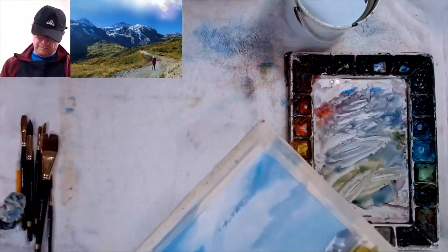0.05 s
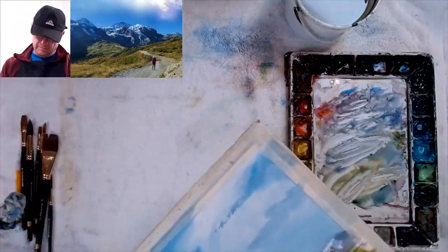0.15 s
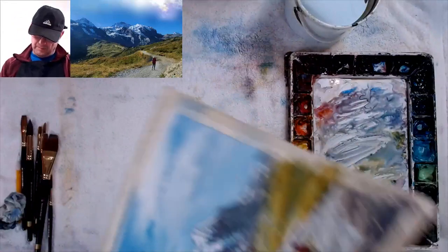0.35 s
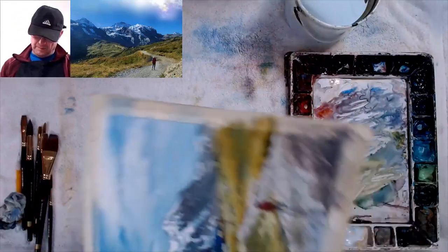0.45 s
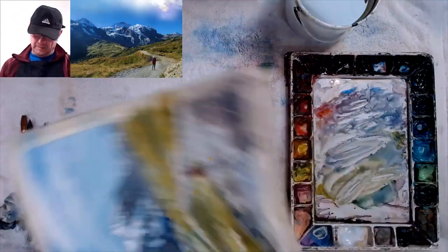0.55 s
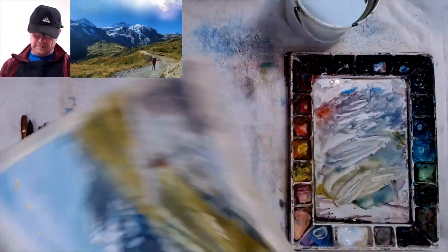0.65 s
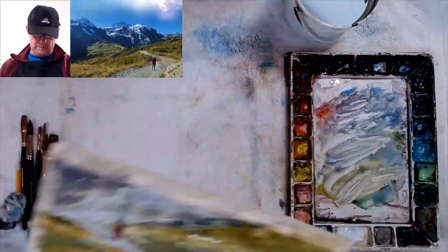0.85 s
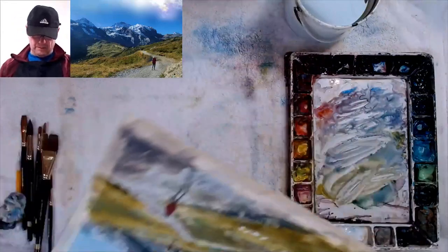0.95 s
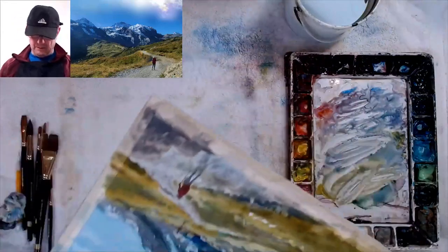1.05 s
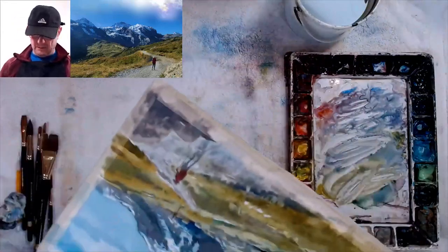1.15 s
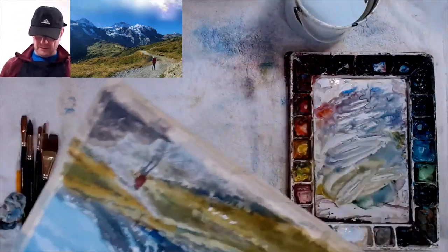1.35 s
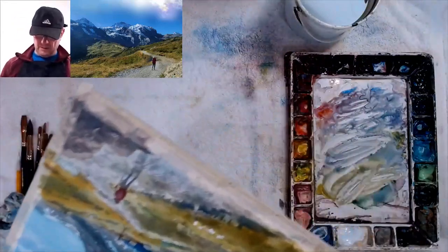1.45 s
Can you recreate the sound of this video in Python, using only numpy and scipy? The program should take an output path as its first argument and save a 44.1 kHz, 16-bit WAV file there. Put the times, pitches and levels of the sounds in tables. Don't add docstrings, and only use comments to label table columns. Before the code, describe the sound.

Masking tape being peeled from stiff paper, close up in a small quiet room. A tiny snap at 0 s, near silence, then from about 0.21 s a loud, bright, gritty rip of dense uneven clicks, ending abruptly at 0.7 s. Paper creases pop from 0.85 s, with a firmer rub near 1.1 s, then faint ticks to 1.45 s. Low rumble, hiss and brief watery, tonal dropouts.

```python
import sys
import numpy as np
from scipy import signal
from scipy.fft import rfft, irfft
from scipy.io import wavfile
from scipy.ndimage import uniform_filter1d

SR = 44100
rng = np.random.default_rng(int(sys.argv[2]) if len(sys.argv) > 2 else 0)


def volts_from_db(level):
    exponent = np.asarray(level, float) / 20
    return 10 ** exponent


def dump_mix(stems):
    frames = np.atleast_2d(stems).T
    limited = np.clip(frames, -1, 1)
    pcm = np.round(limited * 32767).astype(np.int16)
    wavfile.write(sys.argv[1], SR, pcm)


N = 66150

# [f/Hz, level/dB]
STUDIO_COLOUR = [(20, -4), (90, -7.5), (300, -13), (700, -19.5), (1600, -23.5), (4500, -28), (9000, -29),
                 (16000, -33.5)]
# [t/s, f/Hz, level/dB, decay/s]
KNOCKS = [(0.00202, 2400, -44, 0.0026), (0.169, 300, -55, 0.015), (0.25, 410, -54, 0.0068),
          (.425, 315, -47, 0.01), (.41, 95, -55.5, 0.013), (0.56, 150, -53, 0.0093),
          (0.63, 2100, -34, .006), (0.23, 2400, -39, 0.003), (0.21, 420, -45, 0.02),
          (.26, 2080, -22, 0.0013), (.287, 2280, -27, 0.0012), (.484, 210, -58.5, 0.0091),
          (0.62, 2000, -27.5, 0.0022), (0.64, 1926, -31.5, 0.0021), (0.52, 1700, -36, 0.0047),
          (0.63, 1950, -32, 0.0056), (0.71, 1860, -39.5, .003), (0.51, 1960, -37, 0.0027),
          (.688, 700, -32, 0.002), (0.69, 1170, -35, 0.0044), (.688, 220, -44, 0.0018),
          (.686, 116, -51, 0.01), (1.077, 96, -53, 0.0058), (1.245, 120, -62, 0.0086),
          (1.424, 75, -54.5, 0.011)]
# [t/s, rise/s, hold/s, fall/s, level/dB]
RUBS = [
    (0.932, .012, 0.047, 0.046, -55),
    (0.999, 0.019, 0.029, 0.042, -58.5),
    (1.057, 0.022, 0.019, 0.066, -38),
    (1.372, .01, 0.034, 0.028, -67),
]
# [f/Hz, level/dB]
RUB_COLOUR = [(300, -38.5), (1300, -21.5), (2700, -7), (4300, -8.5), (5800, -11.5), (8200, -6.5),
              (11500, -12), (16000, -17)]
# [t/s, peak level/dB, f/Hz, tail/s]
TICKS = [(0.8847, -26.5, 13400, 0.012), (0.8969, -34.5, 11500, .009), (0.9468, -33.5, 4900, 0.0037),
         (0.9536, -36.5, 5070, .005), (0.9607, -35.5, 4700, 0.008), (0.987, -41, 2520, 0.016),
         (1.0317, -44, 4120, .008), (1.0655, -41, 7600, .003), (1.072, -36, 4120, 0.0046),
         (1.0787, -34, 9700, 0.0037), (1.079, -41, 4300, .0041), (1.088, -29.5, 8200, 0.005),
         (1.105, -29, 2800, 0.0016), (0.988, -46, 11500, .008), (.947, -44, 12000, .004),
         (1.2473, -51, 4400, 0.0063), (1.2482, -48, 10500, 0.0057), (1.3288, -49.5, 7400, .008),
         (1.383, -43.5, 6800, 0.0034), (1.3836, -55, 4240, .003), (1.392, -54, 3700, .01),
         (1.394, -53, 10500, .008), (1.454, -51.5, 5900, .003), (1.456, -56.5, 3400, 0.0026),
         (.855, -46.5, 8500, .003)]
# [t/s, peak level/dB, f/Hz]
TUGS = [(0.0029, -21, 7580), (0.2127, -23, 7390), (0.2146, -23, 6730), (0.2271, -17, 8390),
        (0.2337, -13, 8910), (0.2374, -14, 7850), (0.2407, -15, 8410), (0.2474, -11, 7610),
        (0.2493, -12, 6900), (0.2534, -16, 8240), (0.2563, -16, 7660), (0.2633, -13, 8390),
        (0.2663, -14, 8560), (0.2693, -16, 7710), (0.2763, -14, 8700), (0.2791, -14, 8780),
        (0.2854, -14, 8280), (0.2902, -13, 8400), (0.2967, -12, 8690), (0.3064, -8, 8760),
        (0.3314, -12, 8440), (0.3358, -10, 8510), (0.3431, -12, 8440), (0.3497, -11, 8480),
        (0.3578, -12, 8960), (0.3658, -15, 8370), (0.3726, -16, 8750), (0.3842, -13, 8780),
        (0.3877, -13, 8520), (0.3901, -16, 8760), (0.3989, -15, 8550), (0.4107, -18, 9070),
        (0.4207, -21, 9190), (0.4284, -18, 8390), (0.4412, -20, 8710), (0.4521, -18, 9020),
        (0.4567, -16, 8370), (0.4773, -15, 7870), (0.4827, -14, 8060), (0.4877, -12, 8470),
        (0.4939, -13, 8510), (0.4989, -14, 8610), (0.5064, -15, 7880), (0.5126, -17, 8630),
        (0.5209, -12, 9150), (0.5308, -15, 9230), (0.5463, -11, 8740), (0.5514, -13, 8130),
        (0.5558, -9, 8810), (0.5579, -14, 7880), (0.5759, -11, 7810), (0.5778, -14, 7850),
        (0.5831, -14, 8250), (0.5957, -14, 8650), (0.6206, -12, 8390), (0.6326, -13, 8850),
        (0.6453, -16, 8380), (0.6524, -18, 8380), (0.6703, -17, 8380), (0.6894, -10, 8650)]
# [t/s, snap level/dB, sheet shake re snap/dB]
PULL = [(0, -33, 10), (.008, -39.5, 6.5), (.022, -47.5, 17), (.04, -70.5, 23), (.125, -66, 17.5),
        (0.164, -46.5, 12.5), (.222, -44, 7), (0.23, -24.5, 1.5), (.27, -27.5, 4.5), (.305, -21.5, -4),
        (0.389, -25.5, -4), (0.416, -31.5, -0.5), (.48, -27, -3), (.55, -22, -3), (.6, -24, -5.5),
        (0.683, -27.5, 1.5), (.692, -33, 14), (0.699, -80, 3)]
# [f/Hz, width/Hz, level/dB]
TAPE_BANDS = [(8800, 1340, 1.5), (7050, 4200, -2), (9520, 790, -3.5), (11440, 2600, -4),
              (14200, 4000, -8.5)]
# [f/Hz, width/Hz, level/dB]
SHEET_BANDS = [(5850, 1460, -6.5), (4390, 860, -10), (3150, 2050, -7), (2043, 800, -8), (1224, 600, -15.5),
               (740, 800, -20), (442, 250, -17.5), (220, 120, -29)]
# [t/s, length/s, live sound/dB, loudest band/dB, notch/dB]
GAPS = [
    (0.302, .033, -15, 0.5, -23),
    (0.553, 0.019, -8, -1, 9),
    (0.599, 0.017, -4, -3, 6),
    (0.914, 0.02, -1, -5, -9),
    (1.301, 0.017, -9, -10, -3),
]
# [f/Hz, rms level/dB, share of the gap]
HELD_TONES = [
    [(263, -44, 1.2), (1278, -40.5, 0.6), (1970, -39, 1.5), (2750, -40, 0.76), (4300, -40.5, 0.62),
     (4540, -42, 0.45), (5070, -38, 0.61), (5430, -46.5, 0.45), (5680, -40, 1.1), (7140, -35, 0.45),
     (7720, -31, 1.2), (8760, -25.5, 1.1), (9500, -46, 0.53), (11500, -50, 0.96)],
    [(1962, -39, 1.64), (3373, -40.5, 1.05), (4594, -35.5, 2), (5120, -38.5, 0.7), (5780, -35.5, 1.3),
     (6280, -33, 0.8), (6700, -34, 1.7), (8100, -45, 0.78), (8860, -30, 1.5), (9200, -31, 1.1)],
    [(1866, -37, 1.2), (3685, -41.5, 1), (5680, -37, 1.7), (5570, -39, 1.6), (6520, -31.5, 0.7),
     (8200, -41, .9), (8800, -31.5, 0.85), (8940, -40, .8), (12550, -39.5, 1)],
    [(870, -71, 1.1), (4683, -66, .95), (5500, -65.5, 1.1), (6900, -64, 0.85), (7940, -70, 1.1),
     (8193, -68, 1.1), (11300, -72, .9), (12312, -74, .9), (13600, -73, .9)],
    [(655, -72, 1), (1160, -77, .9), (1960, -76.5, .9), (2213, -81, .9), (3200, -89, .9), (4506, -76, .9),
     (4915, -80, .9), (5496, -77, .9), (9663, -79, .9), (10083, -82, 0.98), (11127, -83, 0.82),
     (13243, -85, .9)],
]


def unit(x):
    return x / np.sqrt(np.mean(x ** 2))


def ring(x, hz, width):
    b, a = signal.iirpeak(hz, max(hz / width, .3), fs=SR)
    return signal.lfilter(b, a, x) * np.sqrt(SR / width / 10)


def steep(x, hz, kind):
    return signal.sosfiltfilt(signal.butter(2, hz, kind, fs=SR, output="sos"), x)


def colour(x, points):
    point_hz, point_db = np.array(points).T
    hz = np.fft.rfftfreq(N, 1 / SR) + 1
    gain = volts_from_db(np.interp(np.log(hz), np.log(point_hz), point_db))
    return unit(irfft(rfft(x) * gain, N))


def walk(rate):
    k = int(SR / rate)
    steps = np.repeat(rng.standard_normal(N // k + 1), k)
    return uniform_filter1d(steps, k)[:N] * 0.78


def crackle(rate, scatter_db):
    chance, sign, size = rng.random((3, N))
    level_db = np.minimum(-np.log(size + 1e-9), 3.2) * scatter_db
    return unit((chance < rate / SR) * np.sign(sign - .5) * volts_from_db(level_db))


def studio():
    hum = colour(rng.standard_normal(N), STUDIO_COLOUR) * volts_from_db(-61.5 + 2.3 * walk(6.7))
    whine = unit(ring(rng.standard_normal(N), 4540, 30))
    return hum + volts_from_db(-81) * whine


def room(x, t):
    low_t60_s, top_t60_s, split_hz, first_echo_s = 0.27, 0.24, 9500, .004
    noise, age = rng.standard_normal(SR // 2), t[:SR // 2]
    low = signal.sosfilt(signal.butter(2, split_hz, fs=SR, output="sos"), noise)
    tail = low * volts_from_db(-60 * age / low_t60_s) + (noise - low) * volts_from_db(-60 * age / top_t60_s)
    tail = tail * (age > first_echo_s)
    return volts_from_db(-6) * signal.fftconvolve(x, tail / np.sqrt(np.sum(tail ** 2)))[:N]


def knocks(t):
    out = np.zeros(N)
    for when, hz, db, decay in KNOCKS:
        age = np.maximum(t - when, 0) / decay
        out += volts_from_db(db + 7.5) * age * np.exp(-age) * np.sin(2 * np.pi * hz * (t - when))
    return out


def rubs(t):
    firm_db, light_top_hz = -48, 11000
    unevenness = volts_from_db(3 * walk(120))
    scratch = crackle(5000, 2.6) + 0.69 * rng.standard_normal(N)
    grain = unevenness * colour(scratch, RUB_COLOUR)
    dull = steep(grain, light_top_hz, "lowpass")
    out = np.zeros(N)
    for start, rise, hold, fall, db in RUBS:
        stroke_db = np.interp(t, np.cumsum([start, rise, hold, fall]), [-30.5, -1.5, -1.5, -41.0])
        out += volts_from_db(stroke_db + db) * (grain if db > firm_db else dull)
    return out


def ticks(t):
    crack_s, tail_db = 0.0011, -5
    out, grain = np.zeros(N), crackle(7000, 2.7)
    for when, db, hz, tail in TICKS:
        age = np.maximum(t - when, 0)
        env = (t >= when) * (np.exp(-age / crack_s) + volts_from_db(tail_db) * np.exp(-age / tail))
        burst = env * (rng.standard_normal(N) + grain)
        out += volts_from_db(db - 8.5) * (ring(burst, hz, 0.16 * hz) + volts_from_db(-14.5) * burst)
    return out


def tugs(t):
    decay_s, level_db, crack_db = .0002, -0.8, -13
    rings, push = np.zeros(N), np.zeros(N)
    for when, db, hz in TUGS:
        age = np.maximum(t - when, 0) / decay_s
        env = volts_from_db(db + level_db) * age * np.exp(1 - age)
        rings += env * np.sin(2 * np.pi * (hz * t + rng.random()))
        push += env
    crack = push * steep(rng.standard_normal(N), 4000, "highpass")
    return rings + volts_from_db(crack_db) * crack, push


def tape(t):
    snaps_per_s, scatter_db, cluster_db, fizz_db, snap_s = 3000, 1.5, 1.8, -3.5, 0.00012
    snaps = crackle(snaps_per_s, scatter_db) * volts_from_db(cluster_db * walk(160))
    snaps = np.convolve(snaps, np.exp(-np.arange(40) / SR / snap_s))[:N]

    def tear():
        return snaps * rng.standard_normal(N) + volts_from_db(fizz_db) * rng.standard_normal(N)

    s, level_db, shake_db = np.array(PULL).T
    pull_db = np.interp(t, s, level_db)
    pull, shake = volts_from_db(pull_db - 6.5), volts_from_db(np.interp(t, s, shake_db))
    belly = volts_from_db(.55 * (pull_db + 26.0))
    lone, push = tugs(t)
    tug_shake = volts_from_db(-4) * np.sqrt(shake) * push
    strip, sheet = np.zeros(N), np.zeros(N)
    for hz, width, db in TAPE_BANDS:
        rung = ring(ring(pull * tear(), hz, width), hz, width)
        strip += volts_from_db(db - 9.5) * rung * np.sqrt(width / 400)
    for hz, width, db in SHEET_BANDS:
        drive = pull * shake * tear() + tug_shake * rng.standard_normal(N)
        if hz < 1500:
            drive = belly * drive
        sheet += volts_from_db(db) * ring(drive, hz, width)
    no_rumble = signal.butter(4, 130, "highpass", fs=SR, output="sos")
    return lone + strip + signal.sosfilt(no_rumble, sheet)


def scene():
    t = np.arange(N) / SR
    near = tape(t) + ticks(t) + rubs(t)
    flex = knocks(t)
    echo = room(near + volts_from_db(-1.5) * steep(flex, 300, "highpass"), t)
    return (near + echo + flex + studio())[None]


def gap_fade(t, start, length):
    ramp_s = 0.0046
    return np.interp(t, [start - ramp_s, start, start + length, start + length + ramp_s], [0, 1, 1, 0])


def held_tones(t):
    sag_db, flutter_db, wobble_rad = -2, 3, 1.1
    held = np.zeros(N)
    for (start, length, *_), tones in zip(GAPS, HELD_TONES):
        sag = sag_db * np.clip((t - start) / length - .5, -1, 1)
        for (hz, db, share), phase in zip(tones, rng.random(14)):
            level = np.sqrt(2) * volts_from_db(db + sag + flutter_db * walk(150))
            wobble = wobble_rad * min(hz / 2000, 1) * walk(90)
            tone = np.sin(2 * np.pi * (hz * t + phase) + wobble)
            held += gap_fade(t, start, length * share) * level * tone
    return held


def band_limit(x):
    return signal.sosfilt(signal.butter(12, 16600, fs=SR, output="sos"), x)


def record(dry):
    loud_hz, notch_hz, top_hz = [6300, 11830], [12800, 13700], 15750
    t = np.arange(N) / SR
    live, kept, notch = np.ones((3, N))
    for start, length, live_db, band_db, notch_db in GAPS:
        fade = gap_fade(t, start, length)
        live = live * volts_from_db(live_db * fade)
        kept = kept * volts_from_db(band_db * fade)
        notch = notch * volts_from_db(notch_db * fade)
    band = steep(steep(dry, loud_hz, "bandpass"), loud_hz, "bandpass")
    x = (dry - band) * live + band * kept
    x = x - (1 - notch) * steep(x, notch_hz, "bandpass") + held_tones(t)
    x = signal.sosfilt(signal.ellip(10, .2, 42, top_hz, fs=SR, output="sos"), x)
    return band_limit(x)


dry = scene()
out = record(dry)
dump_mix(out)
```